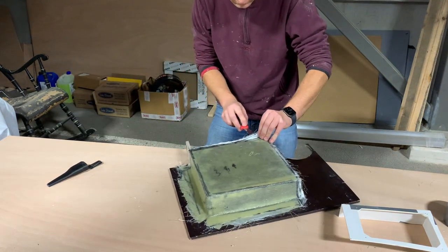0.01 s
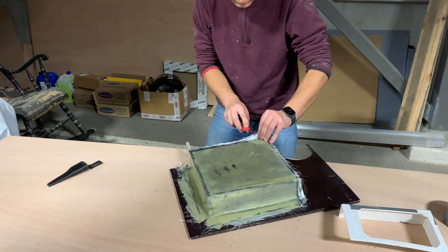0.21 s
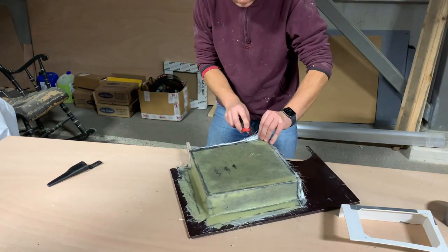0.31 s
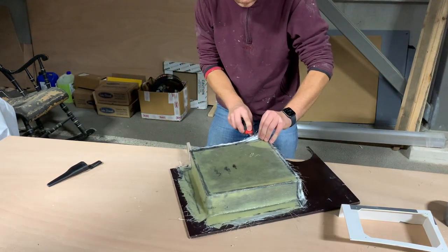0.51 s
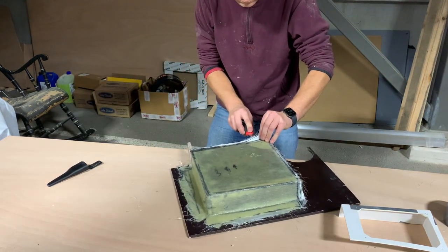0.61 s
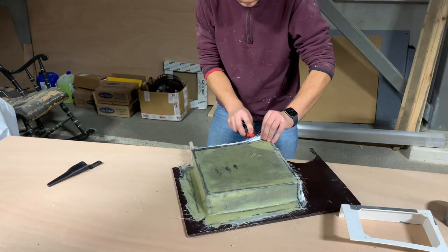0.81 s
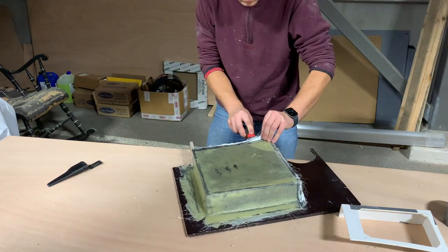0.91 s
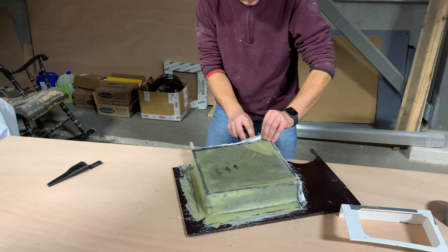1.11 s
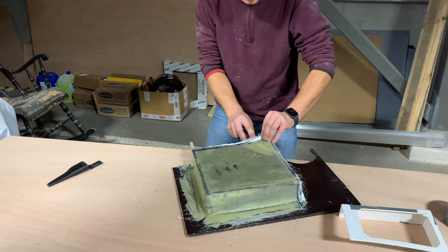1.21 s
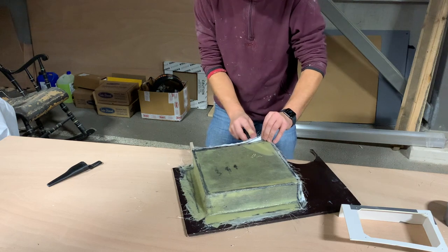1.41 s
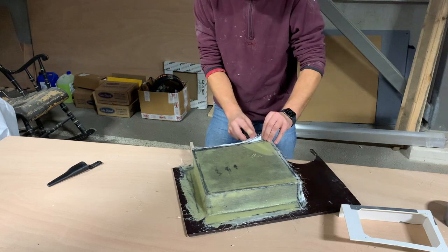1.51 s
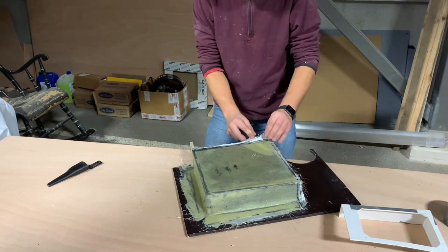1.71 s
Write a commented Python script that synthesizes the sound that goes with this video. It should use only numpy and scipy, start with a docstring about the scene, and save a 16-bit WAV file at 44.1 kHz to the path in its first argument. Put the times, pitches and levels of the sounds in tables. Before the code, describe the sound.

Brittle fibreglass crackling and ripping away from a wooden mold, bright snaps peaking near the middle with a hollow panel boom, then soft knocks on wood; echoing workshop with faint low rumble, camera microphone nearby.

```python
"""Shell prised off a mold

A hardened fibreglass shell is pried off a waxed wooden mold in a workshop, near a camera. The bond gives way in
rasps of random tiny cracks and in snaps: a tick, gritty noise and a brief twang. Resonances ring the shell;
filtered noise and decaying sines make the soft booms of the panel. Two dull taps knock on the wood. The
workshop adds a noise-built reverb, low rumble, hum and hiss."""
import sys
import numpy as np
from scipy import signal
from scipy.fft import rfft, irfft, next_fast_len
from scipy.io import wavfile
from scipy.ndimage import map_coordinates

SR = 44100
rng = np.random.default_rng(int(sys.argv[2]) if len(sys.argv) > 2 else 0)


def inscribe(sig):
    """Save sig as 16-bit PCM at rate SR to the path in sys.argv[1].

    A 1-D sig is mono; a 2-D sig holds one channel per row.
    Samples are clipped to [-1, 1] before scaling.
    """
    pcm = np.round(np.clip(np.atleast_2d(sig).T, -1, 1) * 32767)
    wavfile.write(sys.argv[1], SR, pcm.astype(np.int16))


N = 79380  # samples, 1.8 s


def amp(db):
    """Decibels to gain."""
    return 10 ** (np.asarray(db) / 20)


def unit(x):
    """Scaled to rms 1."""
    return x / np.sqrt(np.mean(x ** 2) + 1e-20)


def along(points, hz):
    """Reads a curve of (hz, value) points on a log frequency axis."""
    point_hz, values = np.transpose(points)
    return np.interp(np.log(hz + 1), np.log(point_hz + 1), values)


def curve(points):
    """Draws an envelope through (time_s, value) points, one value per sample."""
    return np.interp(np.arange(N) / SR, *np.transpose(points))


def filtered(x, response):
    """Passes x through a complex response of frequency, with padding for its tail."""
    n = x.shape[-1]
    padded = next_fast_len(n + 4096)
    spectrum = rfft(x, padded) * response(np.fft.rfftfreq(padded, 1 / SR))
    return irfft(spectrum, padded)[..., :n]


def resonances(table, f):
    """Causal response of (centre_hz, width_hz, gain_db) resonances, with alternating signs."""
    total = 0
    for k, (centre, width, db) in enumerate(table):
        peak = 1j * f * width / (centre * centre - f * f + 1j * f * width)
        total = total + (-1) ** k * amp(db) * peak
    return total


def add(track, s, x):
    """Mixes x into the track from time s, cut at the track's end."""
    part = track[..., max(0, round(s * SR)):][..., :x.shape[-1]]
    part += x[..., :part.shape[-1]]


def noise(colour, side):
    """Stereo noise of rms 1 that fades above colour's last point; side (hz, side_db) sets its width."""
    def shape(f):
        return amp(along(colour, f)) / (1 + (f / colour[-1][0]) ** 8)

    centre, edge = filtered(rng.standard_normal((2, N)), shape)
    edge = filtered(edge, lambda f: amp(along(side, f)))
    return unit(centre + np.outer([1, -1], edge))


# Relative colour of the rumble: pitch_hz, gain_db
RUMBLE_COLOUR = [(15, -33.5), (25, -17), (70, 2), (101, 1), (130, -4.5), (189, -0.5), (241, -9.5),
                 (315, -9.5), (637, -25.5), (798, -16), (900, -33), (1170, -69), (1980, -120)]
# Swell of the rumble: time_s, level_db
RUMBLE_LEVEL = [(0, -53.5), (.1, -50.5), (.15, -51.5), (.28, -49.5), (.4, -50.5), (.53, -49.5),
                (.62, -53.5), (.74, -51), (.83, -49), (.92, -49), (1.02, -49.5), (1.15, -47.5),
                (1.22, -54.5), (1.4, -52), (1.55, -51.5), (1.8, -50)]
# Relative colour of the hiss: pitch_hz, gain_db
AIR_COLOUR = [(300, 0.5), (800, 3.5), (1500, -10.5), (4000, -16), (8000, -30), (11000, -29), (14000, -32.5),
              (16000, -33)]
# Stereo width of the background: pitch_hz, side_db
WIDTH = [(40, -16.5), (100, -15.5), (300, -8.5), (700, 2), (2000, -1.5)]
HUM_HZ, HUM_DB, AIR_DB = 297.4, -64, -65.5


def workshop():
    """Room tone: a swelling low rumble and thin hiss of shaped noise, and a faint sine hum."""
    hum = amp(HUM_DB) * unit(np.sin(2 * np.pi * HUM_HZ * np.arange(N) / SR))
    rumble = amp(curve(RUMBLE_LEVEL)) * noise(RUMBLE_COLOUR, WIDTH)
    hiss = amp(AIR_DB) * noise(AIR_COLOUR, WIDTH)
    return rumble + hiss + hum


# The microphone's dips for diffuse sound: centre_hz, width_hz, depth_db
NOTCHES = [(8815, 500, 23), (13400, 960, 23)]


def notches(hz):
    """Gain of the microphone for diffuse sound."""
    return amp(-sum(db * np.exp(-((hz - c) / w) ** 2) for c, w, db in NOTCHES))


# Decay of the workshop's reverb: pitch_hz, t60_s
ROOM_T60 = [(150, 1), (1000, 1), (4000, 0.96), (8000, 0.47), (15000, 0.32)]
# Colour of the reverb: pitch_hz, gain_db
ROOM_COLOUR = [(200, -2), (1000, -1), (2000, -8), (4000, -3), (7000, -5.5), (11000, -2), (16000, 0)]
# Phase lead of the right port over the left: pitch_hz, lead_radians
RIGHT_LEADS = [(100, 0), (4500, 1), (7200, 1.4), (9500, 5), (15000, 12)]
ROOM_GAP_S, ROOM_RISE_S = 0.008, 0.0053


def heard(x, room_db):
    """A sound at the mold: direct path to both ports plus a fresh tail of decaying noise."""
    hz, t, z = signal.stft(rng.standard_normal((2, SR)), SR, nperseg=256)
    decay = amp(-60 * t / along(ROOM_T60, hz)[:, None])
    tail = signal.istft(z * decay, SR, nperseg=256)[1]
    tail = tail * np.clip((np.arange(tail.shape[1]) / SR - ROOM_GAP_S) / ROOM_RISE_S, 0, 1)
    tail = tail / np.linalg.norm(tail[0])
    tail = filtered(tail, lambda f: amp(along(ROOM_COLOUR, f)) * notches(f))
    out = amp(room_db) * signal.fftconvolve(x[None], tail, axes=1)
    # Half the phase lead goes to each side
    direct = filtered(x, lambda f: np.exp(.5j * np.outer([-1, 1], along(RIGHT_LEADS, f))))
    add(out, 0, direct)
    return out


# Low resonances of the panel: centre_hz, width_hz, gain_db
PANEL = [(118, 34, -4), (180, 110, -7.5), (241.3, 20.7, 4), (330, 90, -11), (790, 150, -12)]
# Flexing of the freed panel, before the room: time_s, level_db
FLEX = [(0, -77), (.42, -62), (.47, -48.5), (.56, -58.5), (.64, -68), (.78, -60), (.92, -62.5), (.96, -41),
        (1.04, -54), (1.15, -54.5), (1.3, -93), (1.8, -76)]


def flexing():
    """The loosening panel booms: noise in its low resonances, swelling as it flexes."""
    boom = unit(filtered(rng.standard_normal(N), lambda f: resonances(PANEL, f)))
    return heard(boom * amp(curve(FLEX)), room_db=-9.5)[:, :N]


# The shell's long-ringing modes: centre_hz, width_hz, gain_db
MODES_RING = [(1056, 13, -6.5), (1172, 25, 3.5), (1520, 9, -7), (1750, 8.3, 3), (1977, 19, -7.5),
              (2170, 63, -6), (2720, 35, -5), (3100, 12, 10.5), (3790, 30, -9), (4035, 110, -5)]
RING_DB = -1.5


def ringing(x, ring_db):
    """The shell's modes ring on after whatever shakes it."""
    return x + amp(ring_db) * filtered(x, lambda f: resonances(MODES_RING, f))


CLUMP_SWING_DB, CLUMPS_PER_S = 9, 260  # swing is either way


def crackle(response, rate, spread_db):
    """Tiny random cracks, louder and softer in clumps, that ring the shell; rms 1."""
    clump_at = np.arange(N) * CLUMPS_PER_S / SR
    clumps = map_coordinates(rng.uniform(-1, 1, N), [clump_at], order=1)
    spread = np.clip(rng.standard_normal(N), -2, 2)
    sizes = amp(spread_db * spread + CLUMP_SWING_DB * clumps)
    cracks = (rng.random(N) < rate / SR) * rng.choice([-1, 1], N) * sizes
    return unit(ringing(filtered(cracks, response), RING_DB))


# Shell resonances, also struck by the snaps and taps: centre_hz, width_hz, gain_db
SHELL = [(1130, 160, -8), (1601, 478, -2), (2180, 740, 2), (2625, 360, 1.5), (4196, 1460, 0.5),
         (6630, 1060, 6), (11660, 3820, 10.5), (14450, 2500, 8)]
# Tearing of the bond, before the room: time_s, level_db
TEAR = [(.06, -76.5), (.082, -61), (.096, -72.5), (.102, -48.5), (.125, -62.5), (.145, -53.5), (.19, -54.5),
        (.21, -42.5), (.245, -44), (.29, -70), (.38, -58), (.41, -40.5), (.455, -42), (.48, -42),
        (.53, -43), (.565, -52), (.60, -76.5), (.74, -78.5), (.77, -56.5), (.83, -44), (.88, -53.5),
        (.93, -43.5), (.965, -33), (1.02, -48), (1.06, -41), (1.13, -42), (1.17, -56), (1.21, -80)]
# Colour of the tearing: pitch_hz, gain_db
TEAR_COLOUR = [(200, -40), (700, -2.5), (1500, -10), (3000, -1), (6000, -6), (8500, -3), (11000, -7.5),
               (15500, 4.5), (17000, -27)]
# Deeper rips, where a whole patch lets go: start_s, level_db, t60_s
RIPS = [(0.466, -33, 0.16), (.954, -38.5, 0.218)]
# Resonances of the rips: centre_hz, width_hz, gain_db
RIP_MODES = [(887, 90, -7), (1159, 76, 5), (1460, 120, -7), (1860, 220, 0), (2650, 270, -3), (3430, 150, 3)]


def tearing():
    """A bright rasp of cracks as the bond peels, and deeper rips that die away."""
    t = np.arange(N) / SR
    rip_level = sum((t > s) * amp(db - 60 * np.abs(t - s) / t60) for s, db, t60 in RIPS)
    rips = rip_level * crackle(lambda f: resonances(RIP_MODES, f), rate=1700, spread_db=0.5)

    def bright(f):
        return amp(along(TEAR_COLOUR, f)) * resonances(SHELL, f) * notches(f)

    rasp = crackle(bright, rate=2600, spread_db=2) * amp(curve(TEAR))
    return heard(rasp + rips, room_db=-7)[:, :N]


# Modes of the flap that a snap sets free: pitch_multiple, level_over_ring_db, t60_s
FLAP = [(1, 1, 0.021), (1.86, -1.5, 0.012)]
SNAP_DB, SNAP_RISE_S = 21, 0.0004  # shared by twang and burst


def flap(hz, db):
    """The freed flap twangs very briefly as decaying sines."""
    t = np.arange(2048) / SR
    out = np.zeros(len(t))
    for multiple, mode_db, t60 in FLAP:
        envelope = amp(-60 * t / t60) * np.clip(t / SNAP_RISE_S, 0, 1)
        x = np.sin(2 * np.pi * multiple * hz * t) * envelope
        out += amp(db + mode_db + SNAP_DB) * x / np.linalg.norm(x)
    return out


# The shell's ranges (body, ring, crack, fizz): low_hz, high_hz, gain_db, after_ring_db, t60_s
RANGES = [(750, 1666, -1, -3.5, 0.055), (1650, 3200, -0.5, -6, 0.01), (3200, 8750, 0, -2, 0.036),
          (8000, 20000, 0.5, -7, 0.032)]
GRIT = 0.76  # unevenness of the breaking fibres


def blow(levels_db, length_s):
    """A gritty burst of breaking fibres that rings on briefly in each range of the shell."""
    t = np.arange(2048) / SR
    fall = 1 + (t / max(length_s, SNAP_RISE_S)) ** 6
    burst = np.clip(t / SNAP_RISE_S, 0, 1) / fall
    out = np.zeros(len(t))
    for db, (lo_hz, hi_hz, gain_db, ring_db, t60) in zip(levels_db, RANGES):
        fibres, sizes, ring = rng.standard_normal((3, len(t)))
        grit = burst * unit(fibres * np.exp(GRIT * sizes))
        after_ring = ring * amp(ring_db - 60 * t / t60) * np.clip(t / length_s, 0, 1)
        shaken = filtered(grit + after_ring, lambda f: resonances(SHELL, f))
        band = signal.butter(3, [lo_hz, hi_hz], 'band', fs=SR, output='sos')
        x = signal.sosfilt(band, shaken)
        out += amp(db + gain_db + SNAP_DB) * x / np.linalg.norm(x)
    return out


BLOW_DELAY_S, TICK_DELAY_S = .0003, .001
TICK_DB, LOUDEST_TICK_DB = -4.5, -7  # trim and ceiling, before the mix level


def blows(table, level_db, room_db, ring_db):
    """Each snap or tap: a sharp tick of limited size inside a gritty burst, and a brief twang."""
    out = np.zeros((2, N))
    tick = filtered(signal.unit_impulse(1024), lambda f: resonances(SHELL, f))
    tick = tick / np.abs(tick).max()
    for s, peak_db, *levels_db, length_s, hz in table:
        x = blow(levels_db, length_s) + flap(hz, levels_db[1])
        x = np.pad(x, (0, SR // 5))  # room to ring on
        add(x, TICK_DELAY_S, amp(min(peak_db + TICK_DB, LOUDEST_TICK_DB)) * tick)
        add(out, s + BLOW_DELAY_S, heard(ringing(x, ring_db), room_db))
    return amp(level_db) * out


# Snaps of the bond, levels before trims:
# start_s, tick_db, body_db, ring_db, crack_db, fizz_db, fracture_s, flap_pitch_hz
SNAPS = [(0.1408, -33, -72, -62, -55, -42, 0.0021, 2460), (0.1487, -37, -81, -64, -58, -39.5, 0.0016, 2440),
         (0.2021, -36, -53, -50, -36, -29.5, 0.0014, 2530),
         (0.232, -11.5, -61.5, -49.5, -48, -33.5, 0.0022, 1990),
         (0.2583, -12.5, -51, -53, -43, -33.5, 0.0025, 1740),
         (0.3282, -47, -64.5, -65.5, -45.5, -42.5, 0.0018, 2990),
         (0.3767, -17, -51.5, -49.5, -39, -29, 0.0023, 2170),
         (0.4288, -35, -60.5, -50, -37, -31, 0.0021, 2770),
         (0.4361, -24, -56, -52.5, -38.5, -36.5, 0.0014, 2780),
         (0.449, -27, -57.5, -45, -50.5, -27.5, 0.0014, 2250),
         (0.4603, -32, -37, -34, -35.5, -19, 0.0014, 2176),
         (0.4692, -2, -32.5, -31, -35, -26.5, 0.002, 2740),
         (0.4939, -16, -51.5, -41, -40, -30, 0.0019, 2830),
         (0.5105, -21, -45, -35.5, -42, -34, 0.0014, 2760),
         (0.5262, -24, -50.5, -39, -41.5, -36, 0.0016, 2430),
         (0.5487, -14, -59.5, -42.5, -40.5, -35, 0.0013, 2270),
         (0.6566, -23.5, -69.5, -55.5, -60.5, -49.5, 0.0016, 1700),
         (0.7017, -17, -47, -36.5, -37, -31.5, 0.0016, 2750),
         (0.7184, -19, -46, -46.5, -40, -28.5, 0.0016, 2700),
         (0.7566, -28, -33.5, -31, -26, -18, 0.0022, 2034),
         (0.798, -21, -46, -46, -41, -30.5, 0.0027, 2710),
         (0.805, -14, -46, -31.5, -34.5, -20, 0.0015, 2224),
         (0.8252, -6, -42.5, -64.5, -37.5, -36, 0.00065, 1390),
         (0.8957, -4.5, -27, -21.5, -20.5, -29, 0.0013, 2240),
         (0.9424, 0, -26.5, -24, -16.5, -17, 0.0021, 2120), (0.9569, 7, -26.5, -37, -17, -20, 0.0018, 1390),
         (0.9788, -20.5, -39, -33, -31, -28.5, 0.00085, 1475),
         (0.9955, -14, -28.5, -30, -26, -20.5, 0.0026, 1507),
         (1.0078, -20, -48, -34, -41, -31, 0.0025, 1736), (1.0298, -22, -49, -32.5, -25, -28, 0.0015, 2740),
         (1.0951, -24, -49, -57, -31.5, -41, 0.0011, 1490),
         (1.1149, -14, -47, -42.5, -29, -31, 0.0022, 2130),
         (1.1366, -18, -41, -42.5, -33.5, -31.5, 0.0022, 2840)]


def snaps():
    """The bond fractures in sharp snaps that ring the shell."""
    return blows(SNAPS, level_db=-2.5, room_db=-4, ring_db=RING_DB)


# Soft low booms of the panel when main snaps strike it, and under the last tap: start_s, pitch_hz, level_db,
# t60_s
BUMPS = [(0.316, 80.1, -40.5, 0.33), (.77, 225.6, -46, 0.31), (.955, 238, -42, .55),
         (1.699, 234.5, -39.5, 0.092)]


def bumps():
    """Low, soft booms of the panel when main snaps strike it and under the last tap: decaying sines with a soft
    onset."""
    out, t = np.zeros(N), np.arange(SR // 2) / SR
    for s, hz, db, t60 in BUMPS:
        envelope = amp(db - 60 * t / t60) * (1 - np.exp(-t / 0.002))
        add(out, s, envelope * np.sin(2 * np.pi * hz * t))
    return out


# Wooden mold under a tap: centre_hz, width_hz, gain_db
WOOD = [(476, 140, 0), (800, 260, 1.5), (1200, 360, 0), (1720, 310, -5.5)]
# Taps on the mold, levels before trims:
# start_s, tick_db, body_db, ring_db, crack_db, fizz_db, burst_s, twang_pitch_hz
TAPS = [(1.644, -39, -47.5, -48.5, -67.5, -60.5, 0.0015, 1180),
        (1.696, -37, -46.5, -54.5, -56, -56, 0.0029, 1193)]
KNOCK_DB, KNOCK_DELAY_S = 23, 0.00207


def knocks():
    """Each tap also knocks on the wood: an impulse through the mold's resonances."""
    hits = np.zeros(N)
    for s, peak_db, *_ in TAPS:
        add(hits, s + KNOCK_DELAY_S, amp([peak_db + KNOCK_DB]))
    return heard(filtered(hits, lambda f: resonances(WOOD, f)), room_db=-6)[:, :N]


def taps():
    """Dull taps: a soft gritty blow together with a knock on the wood."""
    return blows(TAPS, level_db=-3, room_db=-8, ring_db=-10) + knocks()


def scene():
    """Everything at the bench, in stereo."""
    return snaps() + taps() + tearing() + flexing() + bumps() + workshop()


def record(dry):
    """The camera's band limit: a steep low-pass at 16.4 kHz."""
    return filtered(dry, lambda hz: 1 / (1 + (hz / 16400) ** 90))


dry = scene()
out = record(dry)
inscribe(out)
```